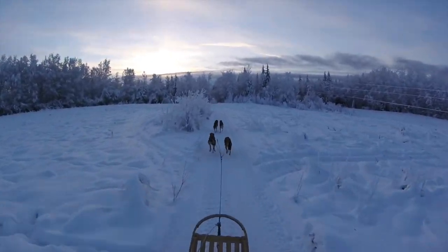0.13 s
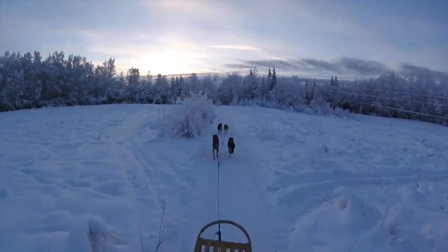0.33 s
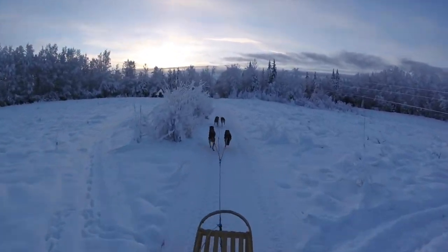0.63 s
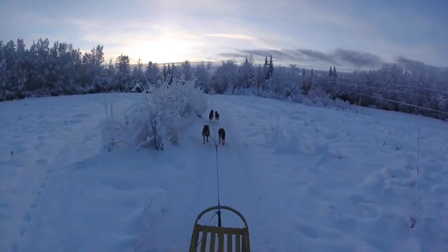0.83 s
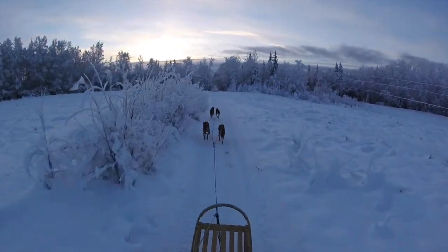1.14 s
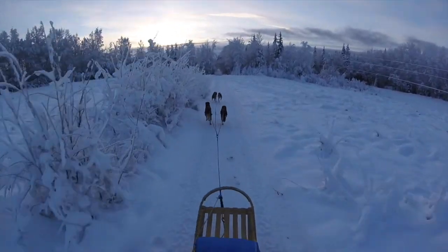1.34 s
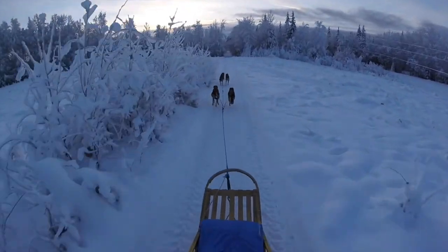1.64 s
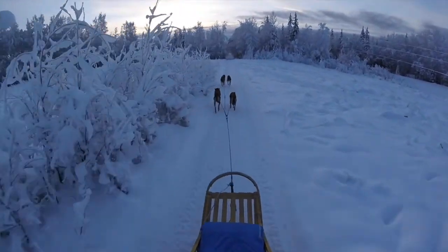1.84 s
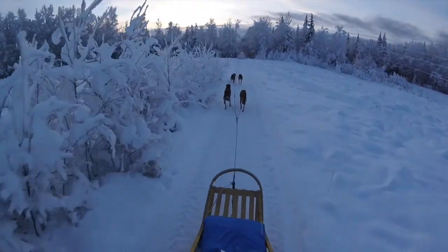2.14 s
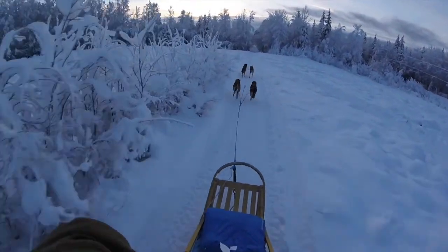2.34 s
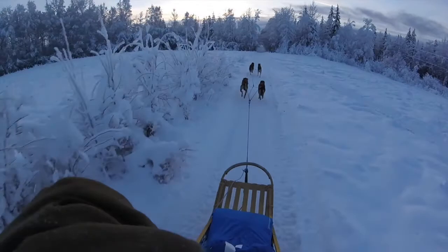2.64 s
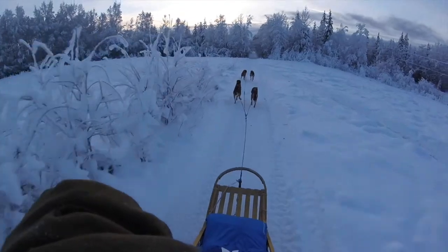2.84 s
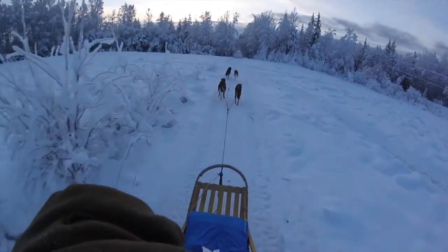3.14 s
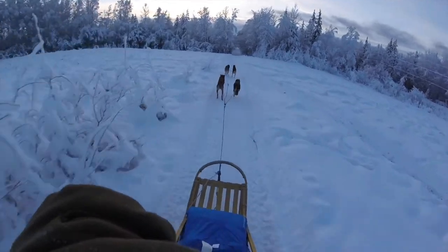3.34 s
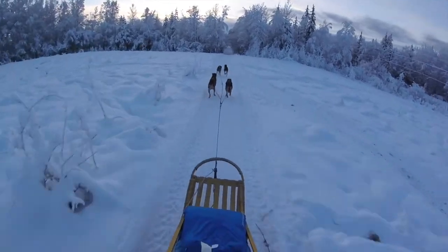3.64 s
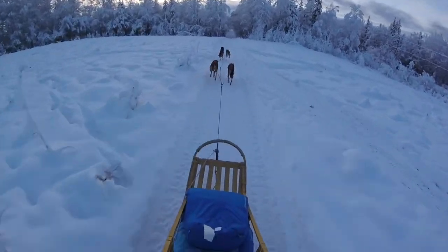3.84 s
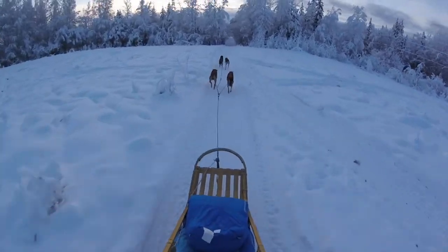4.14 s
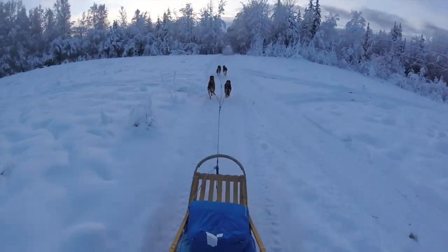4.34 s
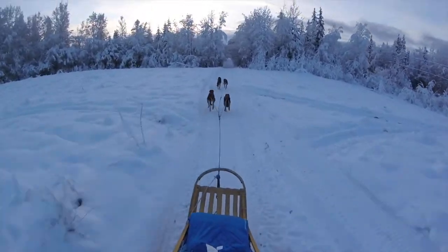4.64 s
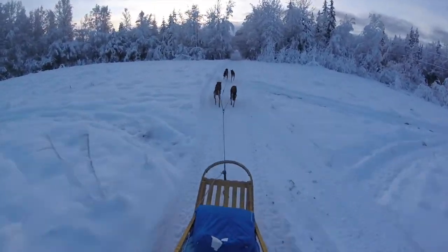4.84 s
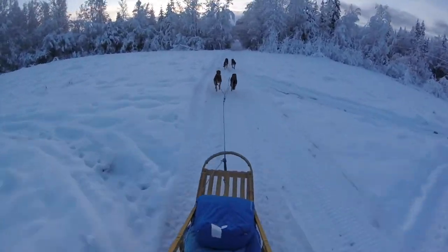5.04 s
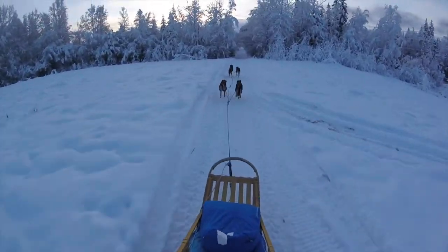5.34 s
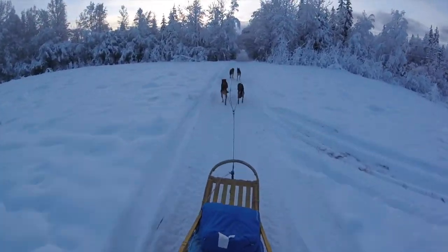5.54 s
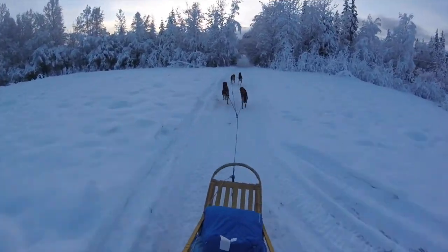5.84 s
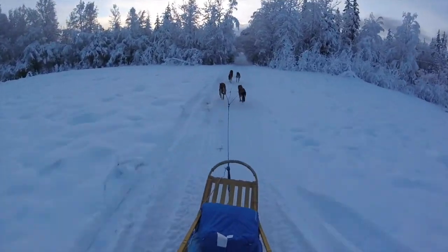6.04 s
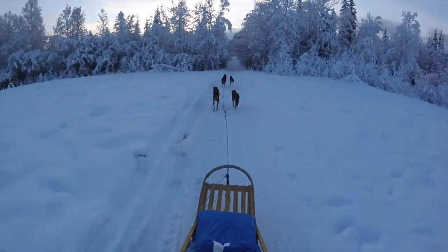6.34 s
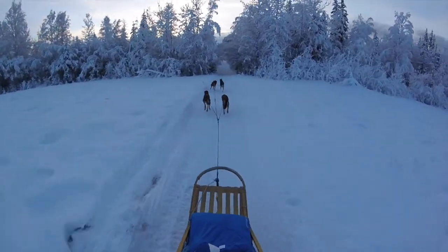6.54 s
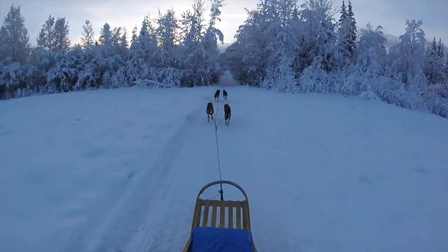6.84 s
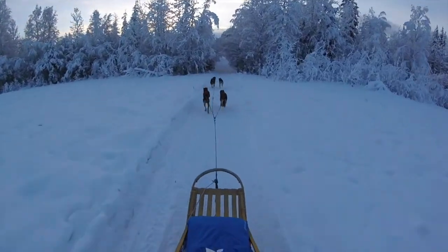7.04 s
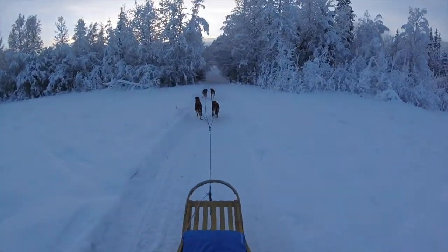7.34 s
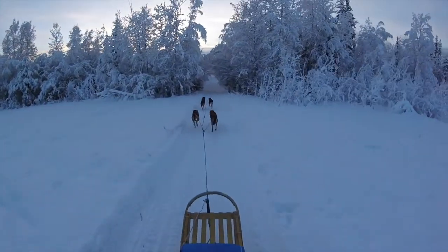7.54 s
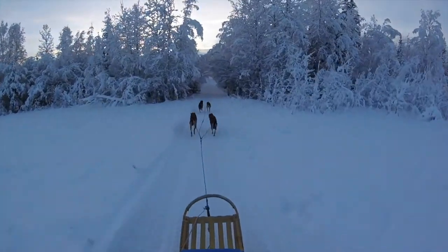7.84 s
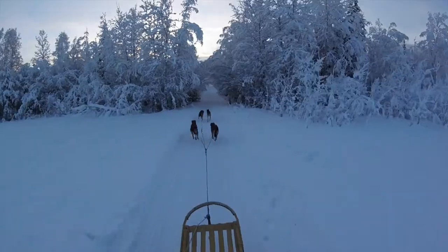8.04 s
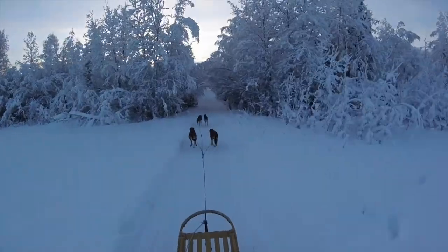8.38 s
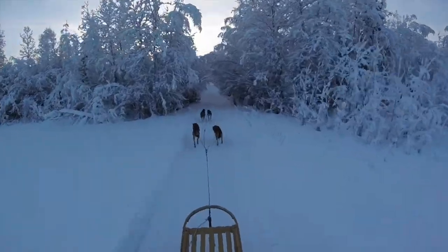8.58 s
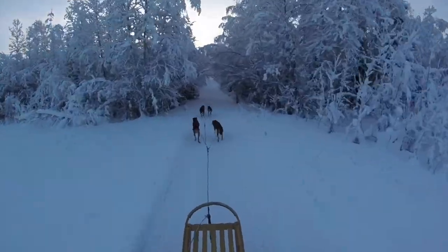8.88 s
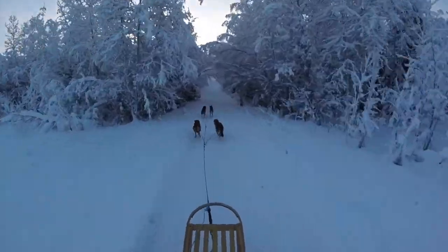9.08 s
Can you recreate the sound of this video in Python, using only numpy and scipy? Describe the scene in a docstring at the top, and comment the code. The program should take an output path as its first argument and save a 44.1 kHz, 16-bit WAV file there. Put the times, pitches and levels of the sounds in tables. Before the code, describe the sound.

Wind rumbles and hoots on the microphone as a wooden sled scrapes along a snowy trail, thumping and creaking now and then.

```python
"""A dog sled on a trail of packed snow, heard from the microphone of a camera worn by the driver.
From the start the runners hiss and crunch below and head wind buffets the microphone; within half a
second crumbs of ice crack and the wooden frame knocks and thumps, later creaking too. From about 2 s
the wind hoots at the housing now and then, and from 3.7 s it howls there as well. The gusts crowd
together after 6 s, and just past 8 s something rubs hoarsely on the sled."""
import sys
import numpy as np
from scipy import signal
from scipy.fft import rfft, irfft
from scipy.io import wavfile
from scipy.ndimage import uniform_filter1d

SR = 44100
rng = np.random.default_rng(int(sys.argv[2]) if len(sys.argv) > 2 else 0)


def unload_audio(sound):
    """Save the sound as a 16-bit wav file, at the path given as the first command line argument."""
    columns = np.transpose(np.atleast_2d(sound))
    # keep every value between -1 and 1, then stretch to whole-number steps
    steps = np.round(np.clip(columns, -1, 1) * 32767)
    wavfile.write(sys.argv[1], SR, steps.astype(np.int16))


N = 406161
T = np.arange(N) / SR


def from_db(db):
    """Decibels to gain."""
    return 10 ** (np.asarray(db) / 20)


def rms_one(x):
    """Scale to an rms of 1."""
    return x / np.sqrt(np.mean(x ** 2) + 1e-20)


def in_time(rows):
    """Each column of a curve, sample by sample."""
    s, *columns = np.transpose(rows)
    return [np.interp(T, s, c) for c in columns]


def swell(s, length, edge_s):
    """An envelope that fades in, holds at 1 and fades out within its length."""
    return np.clip(np.minimum(T - s, s + length - T) / edge_s, 0, 1)


def drift(rate):
    """A random wander of rms 1 that changes about `rate` times a second."""
    hz = np.arange(N // 2 + 1) * SR / N
    return rms_one(irfft(rfft(rng.standard_normal(N)) / (1 + (hz / rate) ** 2), N))


def coloured(x, spectrum):
    """Shape a sound by a spectrum; white input keeps its power."""
    hz = np.arange(1, N // 2 + 2) * SR / N
    points = np.array(spectrum)
    gain = from_db(np.interp(np.log(hz), np.log(points[:, 0]), points[:, 1]))
    return irfft(rfft(x) * rms_one(gain), N)


def filtered(x, order, hz, kind):
    """A low, high or band pass with a flat top."""
    return signal.sosfilt(signal.butter(order, hz, kind, fs=SR, output="sos"), x)


def resonate(x, hz, width):
    """A steep-sided resonance with gain 1 on top."""
    return filtered(x + 1e-18, 2, [hz - width / 2, hz + width / 2], "band")


def evened(x, seconds):
    """Hold the slow level at 1 and keep the fast flutter."""
    return x / np.sqrt(np.abs(uniform_filter1d(x ** 2, max(int(seconds * SR), 2))) + 1e-12)


def grains(per_s, spread_db):
    """Tiny breaks or slips at random times, most of them small; rms 1."""
    sizes = from_db(spread_db * np.minimum(rng.exponential(1, N), 5)) * rng.choice([-1, 1], N)
    return rms_one(sizes * (rng.random(N) < per_s / SR))


# Spectrum of the snow's hiss at the microphone: f/Hz, level/dB
HISS_SPECTRUM = [(3000, -14), (4500, -10), (5000, -6.5), (5900, -7), (7000, 0), (7500, -1), (8300, 2),
                 (9300, 2.5), (9850, -1.5), (10350, -11.5), (10700, -35.5), (12400, -15.5), (13500, -38)]
# Narrow resonances in that hiss: f/Hz, width/Hz, level/dB
HISS_RESONANCES = [(5335, 540, 8), (6503, 335, 14.5)]
def snow_hiss(broad, ringing):
    """The colour of breaking snow: a bright wash and two narrow resonances."""
    peaks = sum(from_db(db) * resonate(ringing, hz, width) for hz, width, db in HISS_RESONANCES)
    return coloured(broad, HISS_SPECTRUM) + peaks


# How hard the runners bear on the snow, heard as hiss: t/s, level/dB
RUNNER_LOAD = [(0, -39), (.6, -40), (1.15, -37.5), (1.4, -37), (2.6, -35), (3.05, -37), (4.1, -33.5),
               (4.9, -35.5), (5.5, -34.5), (6.2, -35.5), (6.85, -33.5), (7.05, -37.5), (7.7, -36.5),
               (8.05, -36.5), (8.28, -40), (8.5, -36.5), (9.21, -37)]
# Scrape against hiss as the snow changes along the trail: t/s, level/dB
SNOW_HARDNESS = [(0, -4.5), (3.0, -5), (4.4, -7), (5.4, -7), (6.3, -6), (7.3, -4.5), (9.21, -5.5)]
# Bumps in the trail change the load on the runners: t/s, length/s, hiss gain/dB
TRAIL_BUMPS = [(0.364, 0.12, 3), (0.67, 0.18, 2), (1.315, 0.31, 1.5), (1.732, 0.091, 2.5),
               (1.844, 0.2, 2.5), (2.342, 0.065, 2.5), (5.386, 0.057, 3), (5.605, 0.17, 2.5),
               (6.26, 0.1, 2), (6.41, 0.12, 2), (7.138, 0.078, 5.5), (8.313, 0.13, 3), (8.47, 0.13, -0.5),
               (8.878, 0.14, 1.5)]
# Spectrum of the scrape: f/Hz, level/dB
SCRAPE_SPECTRUM = [(700, -6.5), (1400, -1), (2000, 0.5), (2650, 2.5), (3100, -4), (3900, -5.5),
                   (4600, -13.5), (7000, -50)]
def runners(scrape_bite):
    """At the driver's feet, breaking crystals merge into hiss and scrape that flutter with pressure."""
    steady_db, = in_time(RUNNER_LOAD)
    hardness_db, = in_time(SNOW_HARDNESS)
    bump_db = sum(db * swell(s, length, edge_s=0.031) for s, length, db in TRAIL_BUMPS)
    scrape_db = hardness_db + scrape_bite * bump_db   # on a bump the scrape gains more than the hiss
    pressure = 0.56 * drift(rate=16.5) + 0.57 * drift(rate=210)
    crackle = grains(per_s=16000, spread_db=2.0) + from_db(-18) * grains(per_s=240, spread_db=6.0)
    ringing = grains(per_s=9000, spread_db=2.5)
    hiss = snow_hiss(crackle * from_db(1.38 * pressure), ringing * from_db(2.23 * pressure))
    scrape = coloured(grains(per_s=6000, spread_db=1.5) * from_db(1.63 * pressure), SCRAPE_SPECTRUM)
    return from_db(steady_db) * (from_db(bump_db) * rms_one(hiss) + from_db(scrape_db) * rms_one(scrape))


# Buffeting of the steady air stream on the microphone: t/s, level/dB
AIR_STREAM = [(0, -32.5), (0.65, -34), (1.0, -33), (2.2, -32), (2.75, -36), (3.3, -29.5), (3.9, -31.5),
              (4.2, -32), (6.0, -31), (9.21, -30.5)]
# Gusts of head wind: t/s, length/s, rise/s, fall/s, level/dB of the large eddies,
# middle eddies against the large/dB, small eddies against the large/dB
HEAD_GUSTS = [(0.097, 0.19, 0.06, .026, -28, -13, -18), (0.46, 0.11, 0.016, .026, -30.5, -7, -11),
              (1.232, 0.11, 0.046, .026, -37.5, 3, -4), (1.742, 0.18, 0.085, .024, -23, -4.5, -8),
              (1.968, 0.027, 0.019, .01, -23.5, -8, -12), (2.154, 0.074, 0.06, .026, -34, -3, -7),
              (3.291, 0.057, 0.014, .012, -23.5, 0, -7.5), (3.363, 0.17, 0.018, 0.007, -25, 2.5, -8),
              (3.591, 0.094, 0.02, .026, -23, -3, -9), (3.64, 0.115, 0.0045, 0.032, -23, -4, -7),
              (4.427, 0.4, 0.21, .026, -26, 2, -2.5), (4.83, 0.2, 0.012, .014, -26, 1, -7),
              (5.089, 0.033, 0.015, .026, -31, 8.5, -2), (5.152, 0.24, 0.081, .014, -24, -2.5, -10),
              (5.4, 0.23, 0.04, 0.029, -23, -5.5, -13), (5.606, 0.22, 0.037, .026, -31, -6, -10.5),
              (6.249, 0.094, 0.03, .005, -20, -4, -12.5), (6.356, 0.028, 0.03, .012, -22, -3, -23),
              (6.47, 0.14, 0.0098, 0.029, -23.5, -2.5, -10.5), (6.622, 0.18, 0.022, 0.024, -24.5, 1.5, -6),
              (6.743, 0.097, 0.051, .007, -19, -10, -14), (6.984, 0.15, 0.03, .026, -22, -1, -5.5),
              (7.134, 0.52, 0.034, 0.023, -22, 0, -3.5), (7.626, 0.362, 0.07, .005, -18.5, -3.5, -7.5),
              (8.003, 0.15, 0.096, .026, -28.5, -7, -5), (8.153, 0.22, 0.06, 0.014, -23.5, -0.5, -3),
              (8.438, 0.249, 0.025, 0.013, -33, 3, 2), (8.71, 0.09, 0.071, .016, -20.5, -8, -11),
              (8.793, 0.15, 0.033, 0.028, -25.5, 3, -1.5), (8.963, 0.061, 0.02, .008, -23.5, -1, -4),
              (9.04, 0.15, 0.019, .026, -39.5, 9, 0.5)]
def air_flow(steady_middle_db, steady_small_db, lock_db):
    """Strength of large, middle and small eddies: each gust rises and dies away on top of the breeze."""
    breeze_db, = in_time(AIR_STREAM)
    large, middle, small = (from_db(db) ** 2 for db in (breeze_db, steady_middle_db, steady_small_db))
    for s, length, rise_s, fall_s, db, middle_db, small_db in HEAD_GUSTS:
        rise = np.clip((T - s) / rise_s, 0, 1)
        fall = np.exp(-np.clip((T - s - length) / fall_s, 0, 20))
        power = (from_db(db) * rise * fall) ** 2
        large = large + power
        middle = middle + power * from_db(middle_db) ** 2
        small = small + power * from_db(small_db) ** 2
    # while the eddies fall into step and hoot, the loose buffeting weakens
    locked = np.minimum(sum(swell(s, length, HOOT_EDGE_S) for s, length, *_ in EDGE_HOOTS), 1)
    return np.sqrt(large) * from_db(lock_db * locked), np.sqrt(middle), np.sqrt(small)


# Spectra of the large, middle and small eddies on the microphone: f/Hz, level/dB
LARGE_EDDIES = [(20, -25), (40, -18), (70, -6), (140, -0.5), (220, -3), (320, -11.5), (600, -38),
                (1500, -94)]
MIDDLE_EDDIES = [(100, -65), (230, 0), (350, 1.5), (500, -1), (700, -8.5), (950, -20), (2000, -81)]
SMALL_EDDIES = [(350, -20), (650, 1), (850, 1), (1150, -3), (1500, -7.5), (2000, -13.5), (3000, -24),
                (6000, -95)]
def wind(lopsided, suction, surge_db, middle_trim_db):
    """Right on the microphone, eddies surge together; smaller ones ride on the suction of the large."""
    large_gain, middle_gain, small_gain = air_flow(steady_middle_db=-36, steady_small_db=-40.5, lock_db=-2)
    puffs = drift(rate=54)
    large = evened(coloured(rng.standard_normal(N) * from_db(2.0 * puffs), LARGE_EDDIES), seconds=0.079)
    # pressure falls with the square of the air speed: sharp dips, rounded tops
    dips = filtered(large ** 2, 2, 90, "high")
    swirl = from_db(1.12 * puffs - lopsided * np.clip(large, -3, 3))
    middle = evened(coloured(rng.standard_normal(N) * swirl, MIDDLE_EDDIES), seconds=0.065)
    small = evened(coloured(rng.standard_normal(N) * swirl, SMALL_EDDIES), seconds=0.057)
    surge = from_db(surge_db * drift(rate=82.0))
    buffet = large_gain * (large - suction * dips)
    rush = from_db(middle_trim_db) * middle_gain * middle + small_gain * small
    return surge * (buffet + rush)


SNAP_TOP_HZ = 9000   # upper edge of the snaps of wood and ice
# Modes of the wooden frame: f/Hz, width/Hz, level/dB
FRAME_MODES = [(820, 420, 14), (1650, 580, 10), (2360, 105, 9.5), (2680, 360, 6.5), (3180, 320, -1.5)]
# The frame knocks and creaks under load, within the driver's reach: t/s, length/s, level/dB,
# joint f/Hz, fall of the modes away from it/(dB per octave), snap against ring/dB
JOINT_SLIPS = [(0.068, .003, -37, 1700, 8, -6), (1.750, .011, -28.7, 2100, 6, -11),
               (1.834, .016, -38, 2640, 30, -20), (1.882, .023, -27.5, 2640, 28, -20),
               (4.926, .005, -29, 2900, 9, -12), (5.245, .022, -36, 2640, 25, -20),
               (5.418, .009, -34, 2200, 4, 1), (5.439, .004, -37, 2900, 4, -2)]
def creaks(slips_per_s):
    """A joint snaps loose, then sticks and slips; knocks ring all the modes, creaks mainly one."""
    out = np.zeros(N)
    t = np.arange(SR // 10) / SR
    for s, length, db, joint_hz, fall_db, snap_db in JOINT_SLIPS:
        slips = np.exp(-2 * (t * slips_per_s % 1)) * (t < length)
        rub = slips * rng.standard_normal(len(t))
        snap = rms_one(filtered(resonate(rub, hz=5000, width=9800), 8, SNAP_TOP_HZ, "low"))
        ring = np.zeros(len(t))
        for hz, width, mode_db in FRAME_MODES:
            octaves_away = abs(np.log2(hz / joint_hz))
            ring += from_db(mode_db - fall_db * octaves_away) * rms_one(resonate(rub, hz, width))
        gain = from_db(db) * np.sqrt(length / t[-1])
        out[round(s * SR):][:len(t)] += gain * (rms_one(ring) + from_db(snap_db) * snap)
    return out


# Hard crumbs of ice down under the runners: t/s, relative level/dB
ICE_CRUMBS = [(0.0682, -18), (0.3805, -27), (0.4189, -24), (0.443, -25), (0.488, -18.5), (0.757, -23),
              (1.261, -20), (1.343, -14.5), (1.7539, -20), (2.1425, -17.5), (2.1834, -19), (2.365, -17),
              (2.4064, -18), (2.5027, -22), (3.5324, -26), (4.431, -26), (5.4187, -18), (6.2836, -16),
              (7.2405, -19.5), (7.3811, -27), (7.891, -17.5), (8.107, -17), (8.1973, -18), (8.202, -20),
              (8.217, -20), (8.23, -18.5), (8.349, -18)]
def crumbs(decay_s, trim_db):
    """Each crumb of ice shatters in a short burst, a little duller than the hiss."""
    force = np.zeros(N)
    for s, db in ICE_CRUMBS:
        start = round(s * SR)
        after = T[start:][:SR // 10]
        force[start:][:len(after)] += from_db(db + trim_db) * np.exp((s - after) / decay_s)
    burst = snow_hiss(force * rng.standard_normal(N), force * rng.standard_normal(N))
    return filtered(burst, 6, SNAP_TOP_HZ, "low")


# Single eddies that hit the microphone head-on: t/s, relative level/dB, width/s
EDDY_SLAPS = [(0.149, -17, .001), (0.207, -5, 0.0012), (0.311, -9, .001), (0.347, -8, 0.0011),
              (1.265, -8, .001), (1.778, -7, .0014), (1.865, -10, 0.00092), (1.878, -7, .0012),
              (3.382, -6, 0.00097), (3.614, 0, .0013), (3.65, 0, .0006), (3.674, 4, 0.00092),
              (5.101, -5, 0.0014), (5.199, -7, 0.0014), (5.601, -3, .0012), (6.193, -5, 0.0011),
              (6.234, -6, 0.0015), (6.298, -1, 0.0011), (6.344, 3, 0.00091), (6.384, 1, 0.0014),
              (6.475, 2, .0007), (6.591, -3, 0.0011), (6.805, -1, .0011), (6.84, 0, 0.0011),
              (6.97, -8, 0.0011), (7.29, -1, 0.00096), (7.699, 2, .0011), (7.726, 3, 0.0011),
              (7.742, 0, .001), (7.794, 5, 0.0008), (7.828, 4, 0.0014), (7.887, 4, 0.00067),
              (7.921, 8, .001), (7.949, 9, .001), (8.239, -2, 0.0011), (8.318, 5, 0.0012),
              (8.368, 1, 0.0011), (8.764, 3, 0.0014), (8.79, -4, .0011), (8.891, 3, .0007),
              (8.948, -1, .0012), (9.014, 3, 0.00092)]
def slaps(trim_db):
    """A passing eddy pulls a sharp dip in pressure between two soft rises; large eddies take longer."""
    out = np.zeros(N)
    for s, db, width_s in EDDY_SLAPS:
        near = np.abs(T - s) < .05
        from_centre = np.abs(T[near] - s - .002) / width_s
        out[near] -= from_db(db + trim_db) * (1 - from_centre) * np.exp(-from_centre)
    return out


# The sled thumps over ruts, below the microphone: t/s, f/Hz, relative level/dB
RUT_THUMPS = [(0.417, 183, -21), (0.818, 195, -20), (0.876, 170, -20), (0.924, 168, -20), (1.267, 152, -26),
              (1.315, 151, -20), (1.982, 201, -23), (2.205, 182, -29), (3.850, 215, -19)]
def thumps(rise_s, trim_db):
    """The loaded sled gives way softly and swings for a few cycles."""
    out = np.zeros(N)
    for s, hz, db in RUT_THUMPS:
        age = np.clip((T - s) / rise_s, 0, 30)
        envelope = age * np.exp(1 - age)
        out += from_db(db + trim_db) * envelope * np.sin(2 * np.pi * hz * (T - s))
    return out


HOOT_EDGE_S = 0.0084
# Eddies shed in step at an edge of the housing, right by the microphone:
# t/s, length/s, first f/Hz, last f/Hz, relative level/dB, octave against the tone/dB
EDGE_HOOTS = [(2.347, 0.092, 345, 391, -30.5, -14), (2.903, 0.054, 337, 360, -28.5, -14),
              (3.303, 0.05, 401, 400, -21, -16), (3.438, .038, 425, 365, -15, -18),
              (3.481, 0.064, 255, 145, -15, -13), (3.715, .06, 85, 125, -19, -20),
              (4.285, 0.085, 74, 92, -26, -3), (4.358, .058, 94, 113, -20, -13),
              (4.61, 0.125, 262, 237, -23.5, -14), (4.853, 0.075, 212, 145, -16, -16),
              (4.94, .06, 190, 250, -23, -14), (5.103, 0.11, 268, 170, -28, -14),
              (5.22, 0.085, 119, 150, -21.5, -14), (5.306, 0.076, 135, 186, -19.5, -14),
              (5.44, .04, 215, 250, -24, -14), (7.03, 0.059, 115, 182, -20, -14),
              (7.08, 0.089, 220, 186, -19, -14), (7.279, 0.082, 170, 220, -17.5, -14),
              (7.637, 0.1, 280, 130, -15.5, -14), (7.745, .1, 135, 175, -17.5, -12),
              (7.997, 0.071, 222, 204, -21, -14), (8.472, .042, 570, 530, -19.5, -20),
              (8.62, 0.04, 485, 530, -18, -22), (8.651, .04, 528, 536, -22, -22)]
def hoots(waver, flutter_db, trim_db):
    """Vortex shedding: an unsteady tone with its octave, whose pitch glides with the air speed."""
    strength, octave, weighted_hz = np.zeros((3, N))
    for s, length, first_hz, last_hz, db, octave_db in EDGE_HOOTS:
        gain = from_db(db + trim_db) * swell(s, length, HOOT_EDGE_S)
        strength += gain
        octave += gain * from_db(octave_db)
        weighted_hz += gain * np.interp(T, [s, s + length], [first_hz, last_hz])
    # hoots that touch run on as one tone
    hz = weighted_hz / (strength + 1e-12) * (1 + waver * drift(rate=69.7))
    phase = 2 * np.pi * (np.cumsum(hz) / SR + rng.random())
    tone = strength * np.sin(phase) + octave * np.sin(2 * phase)
    return tone * from_db(flutter_db * drift(rate=90))


# Air rings in the housing around the microphone: t/s, length/s, f/Hz, width/Hz, level/dB
HOUSING_HOWLS = [(3.658, 0.13, 716, 250, -28), (3.668, 0.094, 970, 200, -26),
                 (4.494, 0.085, 590, 110, -30.5), (4.557, 0.33, 906, 220, -27),
                 (4.585, 0.24, 563, 220, -27.5), (4.94, 0.09, 1010, 330, -30),
                 (5.098, 0.082, 885, 170, -26.5), (6.643, 0.135, 956, 220, -28),
                 (6.893, 0.048, 970, 280, -31), (7.31, 0.33, 960, 300, -31.5), (8.08, 0.26, 620, 90, -32),
                 (8.279, 0.15, 537, 160, -26), (8.522, 0.1, 610, 60, -30), (8.577, 0.067, 440, 220, -23),
                 (8.817, 0.14, 496, 220, -21.5)]
def howls(ragged_db):
    """Gusts blow across the hollows of the housing; each rings raggedly at its own pitch and width."""
    out = np.zeros(N)
    turbulence = rng.standard_normal(N)
    for s, length, hz, width, db in HOUSING_HOWLS:
        ring = evened(resonate(turbulence, hz, width), seconds=0.05)
        out += from_db(db) * swell(s, length, edge_s=0.022) * ring
    return out * from_db(ragged_db * drift(rate=67))


# Something rubs hoarsely on the sled, close by: t/s, length/s, f/Hz, width/Hz, level/dB
SLED_RUBS = [(8.31, 0.069, 3700, 1000, -46), (8.333, 0.11, 1650, 350, -37), (8.43, 0.17, 1610, 260, -36.5),
             (8.435, 0.137, 2470, 600, -39), (8.602, 0.16, 1640, 300, -44)]
def rasp(slips_per_s):
    """Dry friction: each rub is a dense run of slips into a broad resonance of its own."""
    slips = grains(per_s=slips_per_s, spread_db=1.5)
    return sum(from_db(db) * swell(s, length, edge_s=0.026) * rms_one(resonate(slips, hz, width))
               for s, length, hz, width, db in SLED_RUBS)


def scene():
    """From the driver's place, in mono: snow and sled just below, wind right at the microphone."""
    snow = runners(scrape_bite=1.15) + crumbs(decay_s=0.0016, trim_db=-5.0)
    frame = thumps(rise_s=0.0071, trim_db=-2.5) + creaks(slips_per_s=200) + rasp(slips_per_s=1900)
    housing = hoots(waver=0.02, flutter_db=1.9, trim_db=-0.7) + howls(ragged_db=2.0)
    air = wind(lopsided=1.3, suction=0.17, surge_db=0.69, middle_trim_db=-0.54) + slaps(trim_db=-7.5)
    return (snow + frame + air + housing)[None, :]


def record(dry):
    """The camera's microphone: the deepest bass is lost, peaks are rounded, the top is cut."""
    ceiling, top_hz = .72, 13500
    thin = filtered(dry, 1, 25, "high")
    rounded = thin / (1 + (thin / ceiling) ** 4) ** (1 / 4)
    return signal.sosfilt(signal.ellip(10, .1, 80, top_hz, fs=SR, output="sos"), rounded)


dry = scene()
out = record(dry)
unload_audio(out)
```